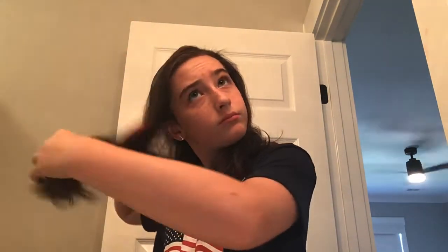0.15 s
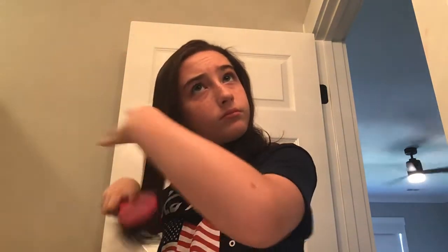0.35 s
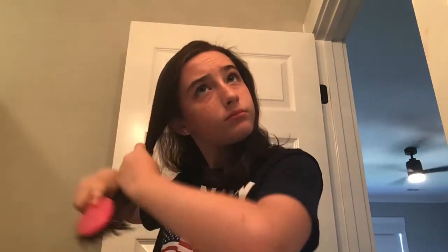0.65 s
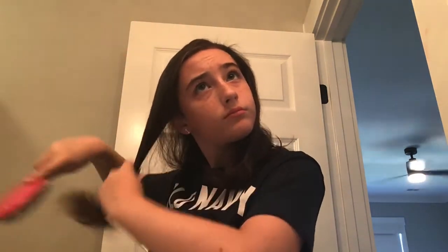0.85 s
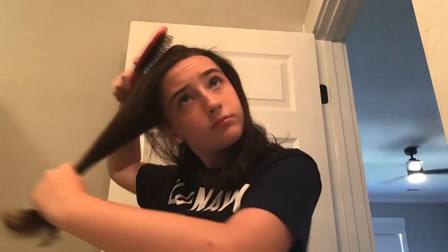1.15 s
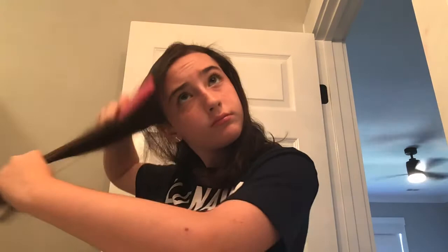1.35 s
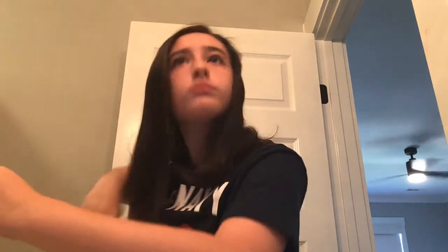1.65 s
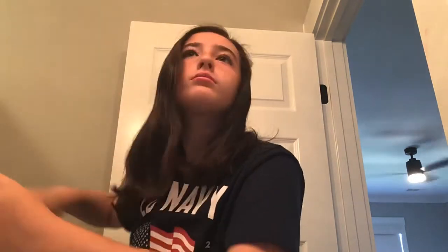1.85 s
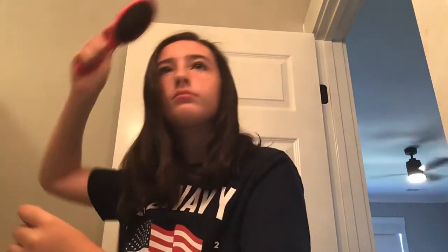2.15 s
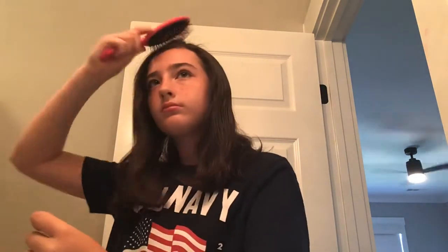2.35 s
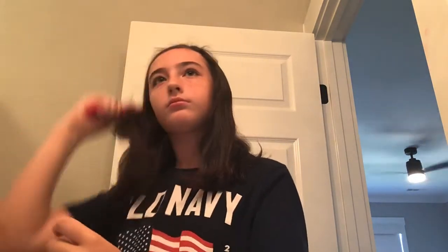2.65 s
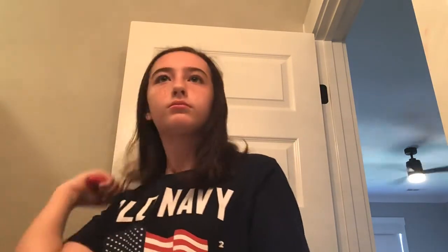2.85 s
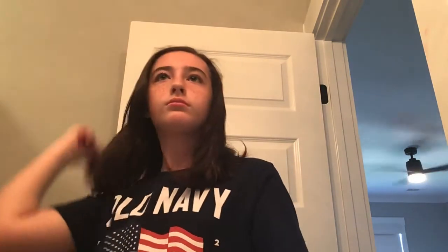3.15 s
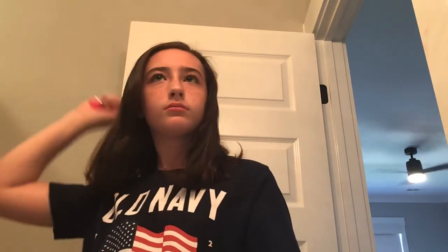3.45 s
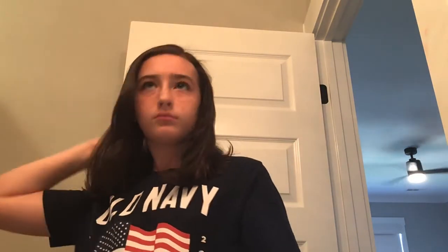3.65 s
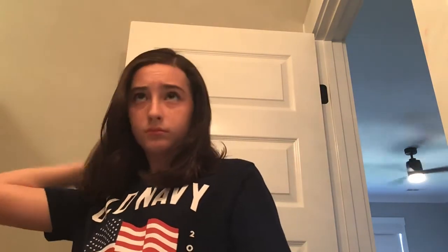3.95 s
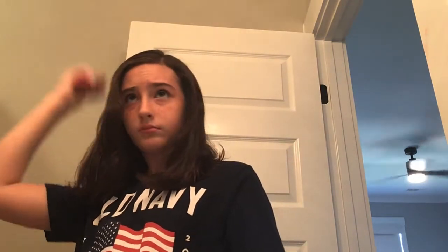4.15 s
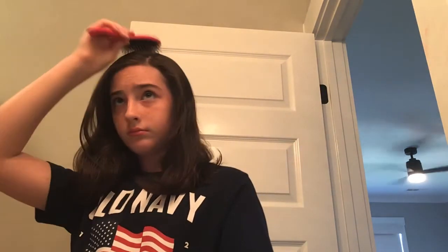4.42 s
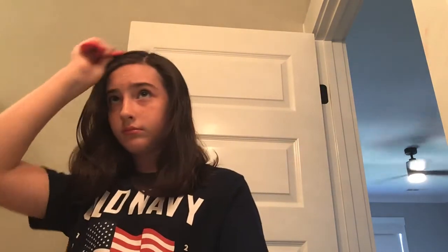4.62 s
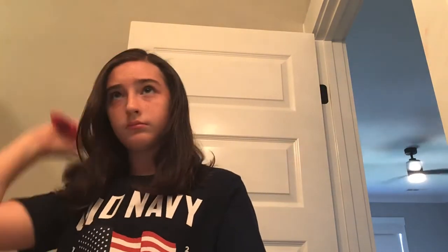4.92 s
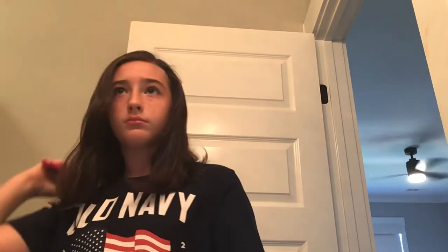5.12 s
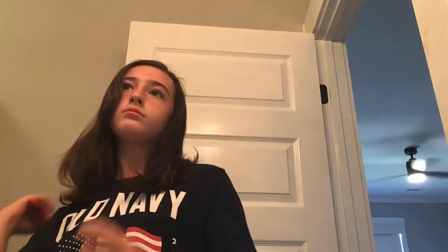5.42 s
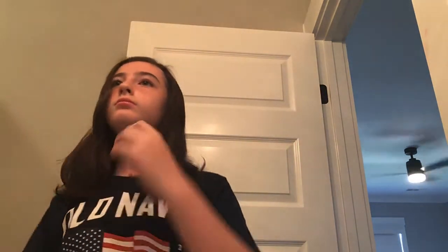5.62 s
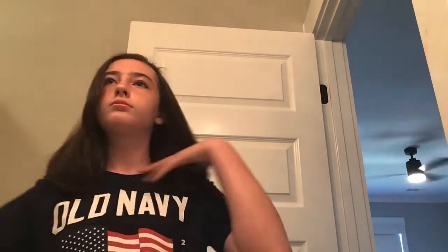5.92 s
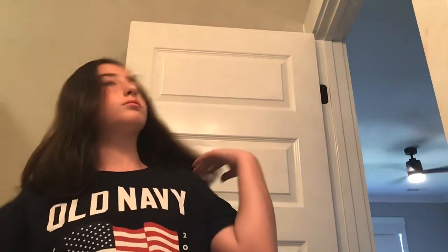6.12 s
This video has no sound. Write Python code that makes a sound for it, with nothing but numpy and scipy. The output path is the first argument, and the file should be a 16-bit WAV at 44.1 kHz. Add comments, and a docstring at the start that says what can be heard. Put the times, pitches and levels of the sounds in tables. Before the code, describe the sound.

In a small room with a low, steady ventilation hum, a plastic brush is drawn through long hair about seven times. The strokes rasp and hiss faintly, with soft pats on the scalp and little ticks as bristles flick free. Hands smooth the hair, then the brush hits a hard counter with one sharp knock and a tiny bounce. The sound is close, with a short room ring.

```python
"""A small room with a low ventilation hum. A plastic brush is drawn through long hair, stroke after stroke.
It pats the scalp; its bristles rasp and hiss down the strands, coloured by the hollow pad, and flick
free at the ends. Hands smooth the hair. At last the brush is put down on a hard counter:
one sharp knock and a small bounce set counter, brush and room ringing."""
import sys
import numpy as np
from scipy import signal
from scipy.fft import rfft, irfft, next_fast_len
from scipy.io import wavfile

SR = 44100
rng = np.random.default_rng(int(sys.argv[2]) if len(sys.argv) > 2 else 0)


def unload_wav(signal):
    """Save mono or channel-first audio to the path in sys.argv[1] as 16-bit WAV at rate SR, clipped to [-1, 1]."""
    wavfile.write(
        sys.argv[1],
        SR,
        np.round(np.clip(np.atleast_2d(signal).T, -1, 1) * 32767).astype(np.int16),
    )


N = 276762
FFT_SIZE = next_fast_len(N, real=True)
FREQ_HZ = np.fft.rfftfreq(FFT_SIZE, 1 / SR)
TIME_S = np.arange(N) / SR
EVENT_S = np.arange(SR // 2) / SR  # time since an onset

# Spectra. Each row: frequency in Hz, relative density in dB.
AIR_SPECTRUM = [(25, -21.5), (50, 1), (84, -1.5), (130, -3.5), (170, 0), (250, -12), (350, -14),
                (600, -21.5), (900, -32), (1500, -36.5), (4500, -37), (7000, -43), (9500, -42),
                (12000, -47), (15500, -46.5)]
CRACK_SPECTRUM = [(100, -4.5), (300, -2.5), (700, 6), (1100, 1.5), (1350, -10), (1800, -1), (2900, -12),
                  (4300, -15.5), (6000, -23.5), (6700, -30), (8500, -34), (15500, -47)]
FLICK_SPECTRUM = [(150, -19), (300, 1), (600, -10), (1050, -0.5), (1800, -9.5), (3300, 0), (6500, -8),
                  (10000, -14), (15500, -23)]
RASP_SPECTRUM = [(240, -17.5), (400, -4.5), (629, -4), (680, -0.5), (837, -20.5), (941, -9.5), (1150, -6.5),
                 (1770, -16.5), (2520, -14.5), (4200, -24), (5460, -30), (9240, -120)]
SLACK_HAIR_SPECTRUM = [(1500, -17), (3000, 4), (4500, 7.5), (6500, 0), (9000, -2), (12000, -11),
                       (15500, -2.5)]
TAUT_HAIR_SPECTRUM = [(2000, -34), (4000, 2), (7000, 4), (9500, 0), (12000, 4), (15500, -4)]
CATCH_SPECTRUM = [(2000, -27), (5000, 3), (9000, -3), (15500, 5)]

# Room modes driven by the ventilation. Each row: frequency in Hz, half width in Hz, level in dB.
DRONE_MODES = [(68.7, 7.4, -61.5), (118.7, 7.8, -51), (138.2, 15.2, -59), (185.7, 5.6, -70.5),
               (220, 47, -76), (284, 9, -75.5)]
# Room modes woken by the knock. Each row: frequency in Hz, level in dB, rise and decay in seconds.
BOOM_MODES = [(90.4, -36, 0.052, 0.084), (121.3, -18.5, 0.037, 0.033), (166.4, -37, 0.022, 0.028)]
# Room decay. Each row: frequency in Hz, T60 in seconds.
ROOM_T60 = [(100, 0.9), (300, 0.42), (1000, 0.26), (3000, 0.22), (8000, 0.24), (15000, 0.27)]
# Reflections off near surfaces, door and walls. Each row: delay in seconds, gain.
KNOCK_ECHOES = [(.0052, 0.062), (.0098, -0.079), (0.0157, .15), (0.0259, -0.095)]
TAP_ECHOES = [(0.0062, 0.4), (0.0085, -0.5), (0.0143, 0.5), (0.021, -0.75), (0.036, 0.2), (0.045, 0.1)]

# Brush hits counter. Each row: start in seconds, push on the counter and snap of the brush in relative dB.
KNOCKS = [(6.1050, -8.5, -8.5), (6.1057, -1, 2.5), (6.1908, -40, -17.5)]
# Modes of the struck bodies. Each row: frequency in Hz, relative level in dB, T60 in seconds.
COUNTER_MODES = [(146, -11, 0.056), (208, -12, 0.056), (316, -15.5, 0.15), (351, -24, 0.36),
                 (496, -2, 0.073), (590, -1, 0.055), (678, 3.5, 0.038), (708, -10, 0.31),
                 (742.6, -10, 0.29), (772, 5, 0.025), (885, -14, 0.12), (970, 1.5, 0.043), (1126, -9, 0.05)]
BRUSH_MODES = [(1396, -29, 0.14), (1810, -14, 0.12), (1893, -2, 0.023), (1866, -18, 0.14),
               (2129, -21, 0.19), (2440, -30, 0.29), (2545, -7.5, 0.029), (3120, -13, 0.031),
               (3336, -6.5, 0.025), (3770, -14, 0.045), (4310, -17, 0.032), (4700, -36, 0.1),
               (5300, -26, 0.03), (5840, -19, 0.018)]
# Resonances of the hollow pad. Each row: frequency in Hz, width in Hz, gain in dB.
PAD_MODES = [(600, 69, -7.5), (970, 160, -3), (1450, 37, -8), (2590, 160, -6.5), (3300, 120, -13)]

# Hair or sleeve swishes. Each row: centre in seconds, level in dB, half length in seconds,
# pitch in Hz, half width in Hz.
SWISHES = [(0.02, -73, 0.13, 5700, 1020), (1.925, -66, 0.1, 5800, 1520), (1.93, -82, 0.08, 10000, 2400),
           (3.858, -72, 0.1, 5050, 1400), (4.237, -65.5, 0.044, 650, 276), (4.764, -70, 0.035, 1210, 200),
           (5.46, -77, 0.073, 5700, 1400), (5.866, -84, 0.089, 5160, 1800)]
# Landings on the hair; blows or jerks to the head. Each row: start in seconds, level in dB,
# pitch in Hz, decay in seconds.
HAIR_PATS = [(0.719, -59, 894, 0.0044), (0.929, -62, 1194, 0.034), (1.352, -70, 1110, 0.077),
             (2.032, -60, 660, 0.0059), (2.543, -61.5, 1177, 0.014), (2.997, -61, 643, 0.052),
             (3.051, -63, 1360, 0.034), (3.526, -58, 580, 0.027), (4.631, -56.5, 618, 0.027),
             (5.222, -66.5, 1060, 0.048), (5.386, -61.5, 874, 0.021)]
HEAD_THUMPS = [(1.793, -40.5, 87, 0.016), (1.794, -39.5, 268, 0.0047), (2.536, -47, 203, 0.011),
               (3.522, -45.5, 213, 0.018)]
# Firm landings. Each row: centre in seconds, peak in dB, pitch in Hz.
FIRM_TAPS = [(0.9299, -51.5, 1230), (1.357, -64, 1160), (3.525, -47.5, 497), (4.63, -49, 424)]
# Brush springs out of the hair. Each row: start in seconds, level in dB.
RELEASES = [(3.051, -56.5), (3.985, -66), (5.562, -79)]
# Single bristles snap free. Each row: start in seconds, level in dB, pitch in Hz.
SNAPS = [(0.123, -73, 6900), (0.72, -74, 3800), (1.136, -75, 5000), (1.357, -62, 3480),
         (2.536, -66.5, 4230), (2.866, -63, 4900), (3.05, -63, 6500), (3.987, -55.5, 8060),
         (4.022, -67, 3200), (5.036, -62, 4800), (5.216, -61, 3520), (5.294, -70, 4200),
         (5.386, -66.5, 2980), (5.503, -67, 7540)]
# Bristles catch and flick free. Each row: start in seconds, relative level in dB, decay in seconds.
FLICKS = [(0.72, -69, 0.0028), (1.355, -67, 0.0071), (1.75, -61.5, 0.015), (1.793, -45.5, 0.015),
          (1.814, -51, 0.019), (2.537, -66, 0.0091), (3.005, -63, 0.0063), (3.05, -61, 0.0063),
          (3.07, -63.5, 0.0054), (3.524, -69, 0.015), (3.985, -60, 0.013), (4.624, -70, 0.0061),
          (5.032, -67, 0.0057), (5.213, -68.5, 0.016), (5.293, -65.5, 0.0073), (5.386, -65.5, 0.014),
          (5.499, -64, 0.005), (5.516, -63.5, 0.016)]
# Drags through tangles or ends. Each row: centre and half length in seconds, rasp and hiss in relative dB.
TUGS = [(0.158, 0.056, -71, -77), (0.36, 0.067, -81, -81.5), (1.043, 0.027, -92, -80),
        (1.527, 0.061, -69.5, -77), (1.824, 0.027, -60, -65), (2.75, 0.12, -69, -97),
        (3.061, 0.025, -63.5, -76), (3.996, 0.052, -68, -87), (5.526, 0.016, -77, -75),
        (5.568, 0.033, -64, -79)]
# Brush or hand runs down the hair. Each row: start and length in seconds, rasp and hiss in relative dB,
# pressure change over the stroke in dB, tension from 0 to 1.
STROKES = [(-0.08, 0.6, -76, -81, 1, 0.41), (0.65, 0.33, -85, -91.5, 16.5, 0.6),
           (1.44, 0.32, -76.5, -79, 14, 0.47), (2.6, 0.38, -75, -81.5, 9.5, 0.23),
           (3.54, 0.46, -72.5, -83.5, 0, 0.14), (4.69, 0.33, -75, -83.5, 3, 0.23),
           (5.16, 0.41, -74.5, -88, 5.5, 0.33)]


def amp(db):
    """Decibels to gain."""
    return 10 ** (np.asarray(db) / 20)


def unit_rms(x):
    """Scales to rms 1."""
    return x / np.sqrt(np.mean(x ** 2) + 1e-20)


def log_interp(points, hz):
    """Reads a table on a log-frequency axis."""
    points_hz, values = np.transpose(points)
    return np.interp(np.log(hz + 1), np.log(points_hz + 1), values)


def unit_band(x, low_hz, high_hz):
    """Scales to rms 1 within a band."""
    band = rfft(x, FFT_SIZE)[(FREQ_HZ > low_hz) & (FREQ_HZ < high_hz)]
    return x / np.sqrt(2 * np.sum(abs(band) ** 2) / (N * FFT_SIZE))


def colour(x, spectrum, size=4096):
    """Minimum-phase filter of unit energy with the given spectrum."""
    gain_db = log_interp(spectrum, abs(np.fft.fftfreq(size, 1 / SR)))
    log_gain = np.log(amp(np.maximum(gain_db, -100)))
    response = np.exp(np.conj(signal.hilbert(log_gain)))
    kernel = np.fft.ifft(response).real[:size // 2]
    return signal.oaconvolve(x, kernel / np.linalg.norm(kernel))[:N]


def narrow_noise(hz, half_width_hz, size=N):
    """Noise in one steep-sided resonance."""
    count = next_fast_len(size, real=True)
    response = 1 / (1 + 1j * (np.fft.rfftfreq(count, 1 / SR) - hz) / half_width_hz) ** 2
    return unit_rms(irfft(rfft(rng.standard_normal(count)) * response, count)[:size])


def grains(per_s, spread_db):
    """Random train of tiny slips; at zero spread all are one size."""
    sizes = amp(spread_db * np.minimum(rng.exponential(1, N), 4))
    return unit_rms(sizes * rng.choice([-1, 1], N) * (rng.random(N) < per_s / SR))


def burst(rise_s, decay_s):
    """Envelope with exponential rise and decay."""
    return (1 - np.exp(-EVENT_S / rise_s)) * np.exp(-EVENT_S / decay_s)


def add(mix, start_s, sound):
    """Adds a sound to the mix in place."""
    part = mix[round(start_s * SR):][:len(sound)]
    part += sound[:len(part)]


def ventilation(air_db=-71.5, hum_hz=116.8, hum_db=-57.5):
    """Moving air, its drone in the room's low modes, and a motor's hum."""
    air_gain = amp(log_interp(AIR_SPECTRUM, FREQ_HZ))
    air = irfft(rfft(rng.standard_normal(FFT_SIZE)) * air_gain, FFT_SIZE)[:N]
    drone = sum(amp(db) * narrow_noise(hz, half_width_hz) for hz, half_width_hz, db in DRONE_MODES)
    hum = np.sqrt(2) * np.sin(2 * np.pi * (hum_hz * TIME_S + rng.random()))
    return amp(air_db) * unit_band(air, 300, 15000) + drone + amp(hum_db) * hum


def room_tail(x, spacing_samples=22):
    """Diffuse tail of sparse reflections, each band dying at its own rate."""
    slots = np.arange(SR // 200, SR // 2, spacing_samples)
    reflections = np.zeros(SR)
    reflections[slots + rng.integers(0, spacing_samples, len(slots))] = rng.choice([-1, 1], len(slots))
    hz, age_s, bands = signal.stft(reflections, SR, nperseg=256)
    decay = amp(-60 * age_s / log_interp(ROOM_T60, hz)[:, None])
    tail = signal.istft(bands * decay, SR)[1]
    return signal.oaconvolve(x, tail / np.linalg.norm(tail))[:N]


def echoes(x, paths):
    """Single reflections from near surfaces."""
    return sum(gain * np.interp(TIME_S - delay_s, TIME_S, x, left=0) for delay_s, gain in paths)


def room_boom():
    """The main blow on the counter wakes the room's low modes, which swell and fade."""
    out = np.zeros(N)
    blow_s = KNOCKS[1][0]
    for hz, db, rise_s, decay_s in BOOM_MODES:
        add(out, blow_s, amp(db) * burst(rise_s, decay_s) * np.sin(2 * np.pi * hz * EVENT_S))
    return out


def ring(modes, contact_s=0.00035):
    """Dying modes of a struck body, alternating in sign."""
    onset = 1 - np.exp(-EVENT_S / contact_s)
    waves = [amp(db - 60 * EVENT_S / t60_s) * np.sin(2 * np.pi * hz * EVENT_S) for hz, db, t60_s in modes]
    return onset * sum((-1) ** k * wave for k, wave in enumerate(waves))


def counter_knock():
    """Each contact cracks, rings counter and brush and shakes the bristles; the room echoes it."""
    thud = amp(-18.5) * ring(COUNTER_MODES)
    clack = amp(-25) * ring(BRUSH_MODES)
    ringing, contacts, shake = np.zeros((3, N))
    for start_s, push_db, snap_db in KNOCKS:
        add(ringing, start_s, amp(push_db) * thud + amp(snap_db) * clack)
        add(contacts, start_s, amp([snap_db]))
        add(shake, start_s, amp(snap_db) * burst(rise_s=0.00025, decay_s=0.0033))
    crack = colour(contacts, CRACK_SPECTRUM)
    rattle = colour(shake * rng.standard_normal(N), CRACK_SPECTRUM)
    direct = ringing + amp(-10) * crack + amp(-20) * rattle
    return direct + echoes(direct, KNOCK_ECHOES) + room_tail(amp(-37) * ringing + amp(-5.5) * crack)


def swishes():
    """Loose hair or a sleeve slides over the shirt or past the brush: soft swells of friction noise."""
    return sum(amp(db) * np.exp(-((TIME_S - centre_s) / half_s) ** 2) * narrow_noise(hz, half_width_hz)
               for centre_s, db, half_s, hz, half_width_hz in SWISHES)


def pats():
    """Soft blows on hair and scalp: a dull note, blurred by the rustle of pressed bristles."""
    out = np.zeros(N)
    for start_s, db, hz, decay_s in HAIR_PATS + HEAD_THUMPS:
        note = np.sqrt(2) * np.sin(2 * np.pi * (hz * EVENT_S + rng.random()))
        rustle = narrow_noise(hz, half_width_hz=0.26 * hz, size=len(EVENT_S))
        envelope = burst(rise_s=0.014 * decay_s, decay_s=decay_s)
        add(out, start_s, amp(db) * envelope * (0.37 * note + 0.83 * rustle))
    return out


def firm_taps(half_length_cycles=1.03):
    """Brush or hand lands with one hollow pulse; door and walls return a quick flutter."""
    out = np.zeros(N)
    for centre_s, db, hz in FIRM_TAPS:
        cycles = (TIME_S - centre_s) * hz
        out += amp(db) * np.exp(-(cycles / half_length_cycles) ** 2) * np.cos(2 * np.pi * cycles)
    return out + echoes(out, TAP_ECHOES)


def hollow_pad(x):
    """The pad under the bristles adds its resonances."""
    body = sum(amp(db) / (1 + 2j * (FREQ_HZ - hz) / width_hz) for hz, width_hz, db in PAD_MODES)
    return irfft(rfft(x, FFT_SIZE) * (1 + body), FFT_SIZE)[:N]


def pad_releases(width_ratio=0.36):
    """Freed from the hair, the pad rings briefly with narrower resonances."""
    out = np.zeros(N)
    for start_s, db in RELEASES:
        ringing = sum(amp(mode_db) * narrow_noise(hz, width_ratio * width_hz, size=len(EVENT_S))
                      for hz, width_hz, mode_db in PAD_MODES)
        add(out, start_s, amp(db) * burst(rise_s=0.0081, decay_s=0.023) * ringing)
    return out


def bristle_snaps(decay_s=0.0012):
    """One stiff bristle slips its strand with a sharp tick."""
    out = np.zeros(N)
    for start_s, db, hz in SNAPS:
        tick = narrow_noise(hz, half_width_hz=0.12 * hz, size=len(EVENT_S)) * np.exp(-EVENT_S / decay_s)
        add(out, start_s, amp(db) * tick * np.sqrt(decay_s * SR) / np.linalg.norm(tick))
    return out


def bristle_flicks():
    """Bent bristles spring back in a quick crackle."""
    envelope = np.zeros(N)
    for start_s, db, decay_s in FLICKS:
        add(envelope, start_s, amp(db) * burst(rise_s=0.00041, decay_s=decay_s))
    crackle = envelope * grains(per_s=9900, spread_db=2)
    return amp(-1) * hollow_pad(colour(crackle, FLICK_SPECTRUM))


def stroke_pressure(attack_s=0.074, release_s=0.055, rasp_fall_db=2):
    """Gains of rasp and hiss: each stroke sets in, runs and lets go; tugs swell on top."""
    power = np.zeros((2, N))
    for start_s, length_s, rasp_db, hiss_db, change_db, _ in STROKES:
        age_s = TIME_S - start_s
        along = np.clip(age_s / length_s, 0, 1) - 0.5
        contact = np.clip(age_s / attack_s, 0, 1) * np.exp(-np.maximum(age_s - length_s, 0) / release_s)
        pressure = contact * amp(change_db * along)
        power[0] += (pressure * amp(rasp_db - rasp_fall_db * along)) ** 2  # bristles leave the scalp
        power[1] += (pressure * amp(hiss_db)) ** 2
    for centre_s, half_s, rasp_db, hiss_db in TUGS:
        swell = np.exp(-((TIME_S - centre_s) / half_s) ** 2)
        power += (amp([[rasp_db], [hiss_db]]) * swell) ** 2
    return np.sqrt(power)


def hair_strokes():
    """Bristles slip over countless strands: a rasp from the pad and a fine hiss, brighter on taut hair."""
    rasp_gain, hiss_gain = stroke_pressure()
    uneven_pull = amp(1.3 * narrow_noise(0, half_width_hz=32))
    centres_s = [start_s + length_s / 2 for start_s, length_s, *_ in STROKES]
    tension = np.interp(TIME_S, centres_s, [row[-1] for row in STROKES])
    scratch = colour(grains(per_s=2600, spread_db=-1), RASP_SPECTRUM)
    rasp = unit_band(hollow_pad(scratch), 900, 3800)
    slips = grains(per_s=8100, spread_db=0)
    slack = unit_band(colour(slips, SLACK_HAIR_SPECTRUM), 8000, 15000)
    taut = unit_band(colour(slips, TAUT_HAIR_SPECTRUM), 8000, 15000)
    hiss = (1 - tension) * slack + tension * taut
    strand_catches = amp(-12) * colour(grains(per_s=170, spread_db=2), CATCH_SPECTRUM)
    return uneven_pull * (rasp * rasp_gain + (hiss + strand_catches) * hiss_gain)


def scene():
    """Brushing and the knock in the room, over the ventilation; mono."""
    brushing = (hair_strokes() + swishes() + pats() + firm_taps()
                + bristle_flicks() + bristle_snaps() + pad_releases())
    return (brushing + room_tail(amp(-7) * brushing) + counter_knock() + room_boom() + ventilation())[None]


def record(dry, low_cut_hz=100, high_cut_hz=15800):
    """Bass roll-off and a steep treble limit."""
    highpass = signal.butter(2, low_cut_hz, "highpass", fs=SR, output="sos")
    lowpass = signal.firwin(511, high_cut_hz, window=("kaiser", 9), fs=SR)
    return signal.oaconvolve(signal.sosfilt(highpass, dry), lowpass[None], "same")


dry = scene()
out = record(dry)
unload_wav(out)
```